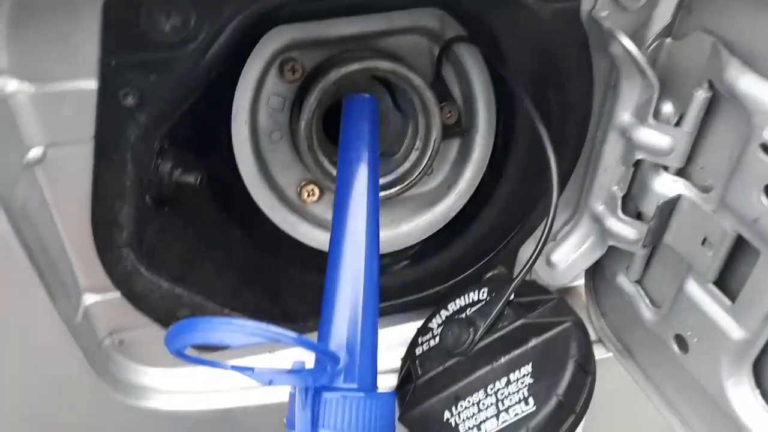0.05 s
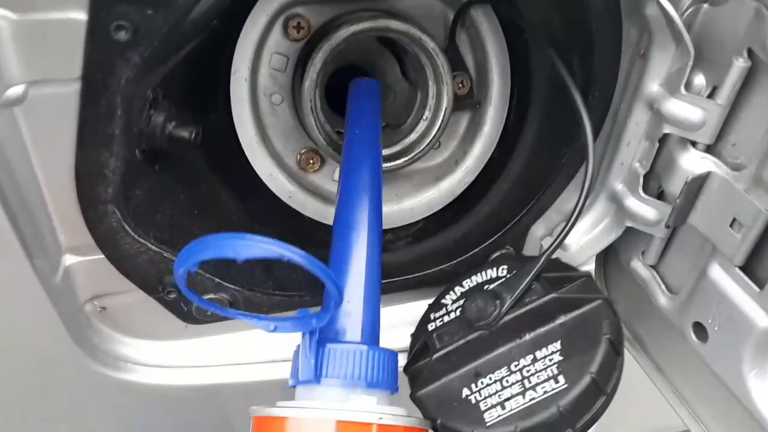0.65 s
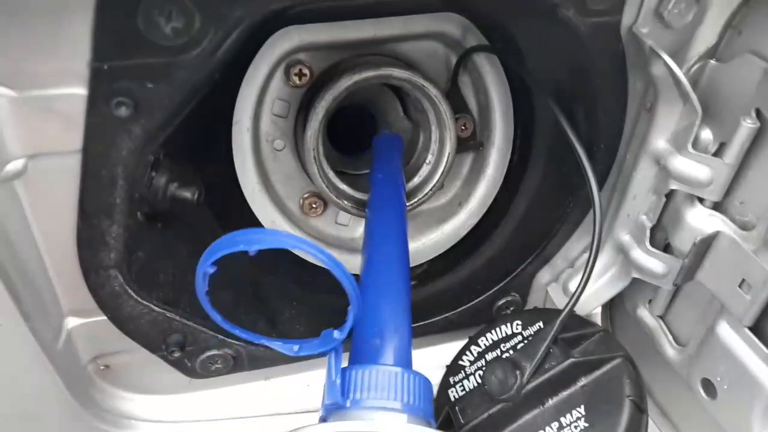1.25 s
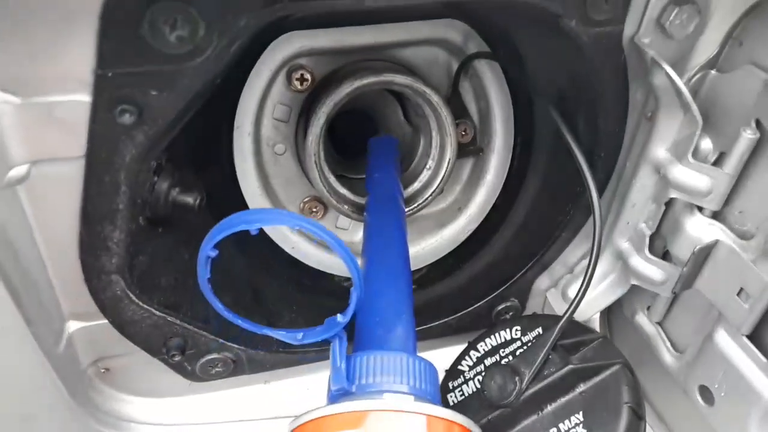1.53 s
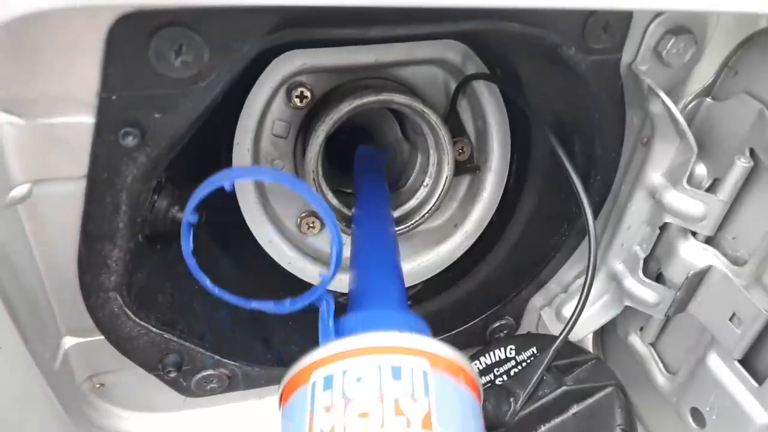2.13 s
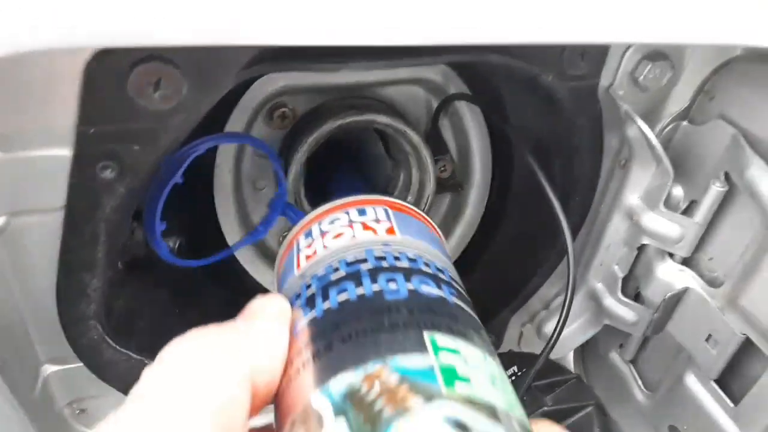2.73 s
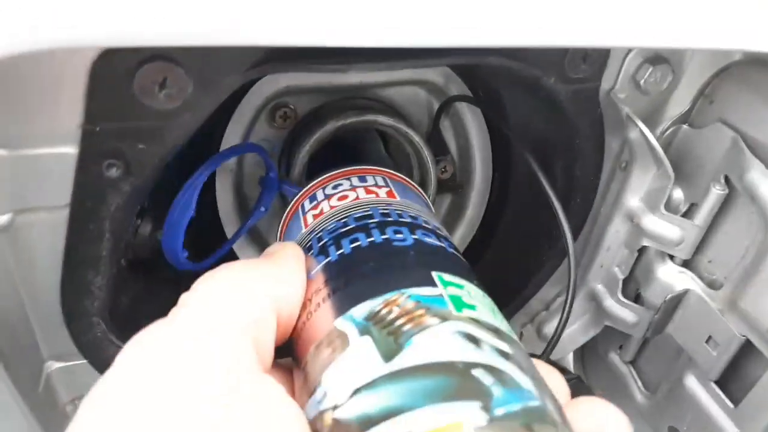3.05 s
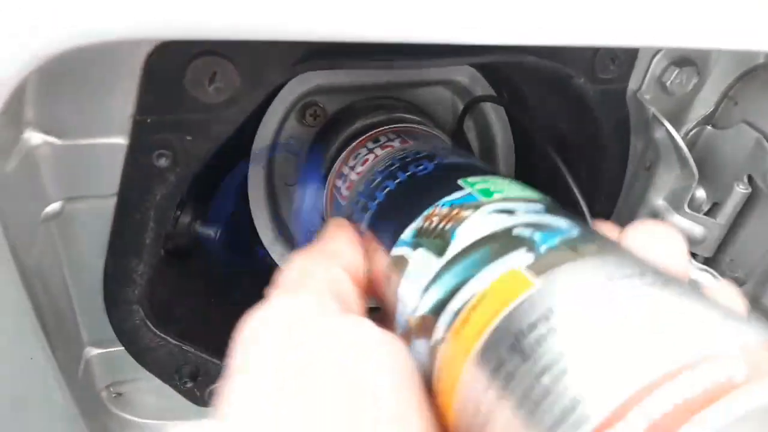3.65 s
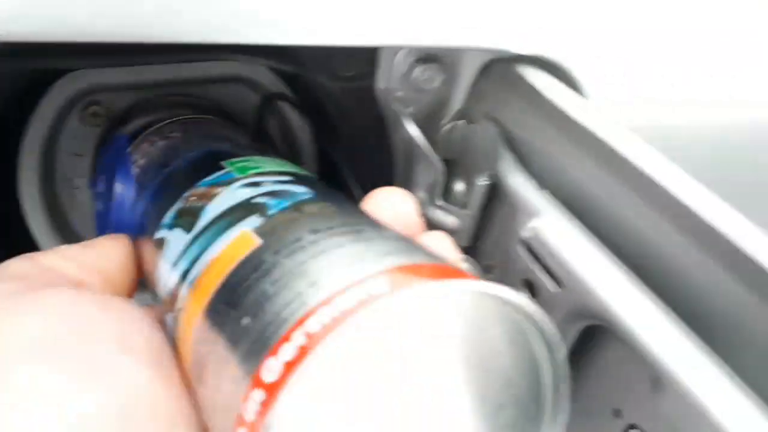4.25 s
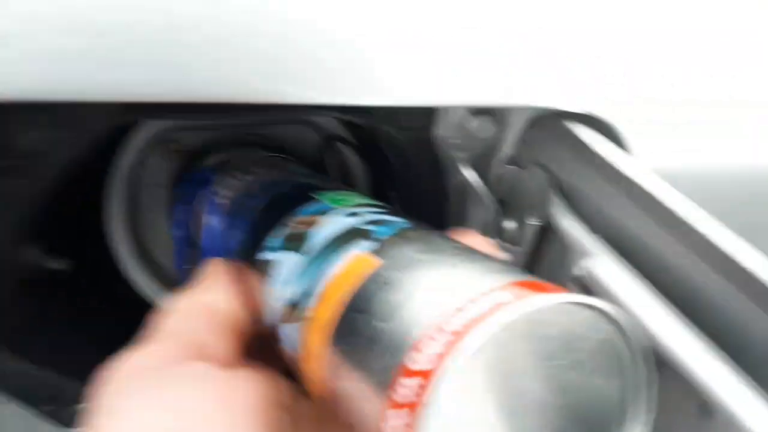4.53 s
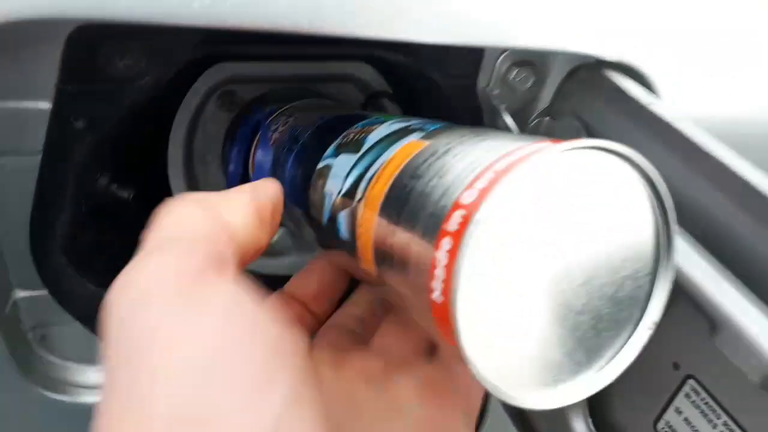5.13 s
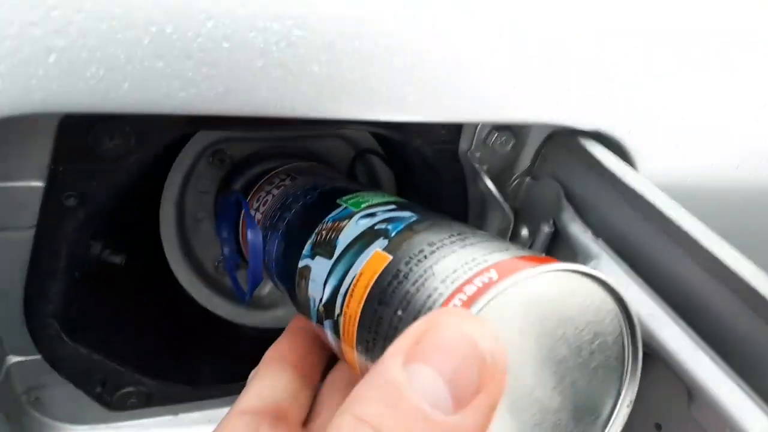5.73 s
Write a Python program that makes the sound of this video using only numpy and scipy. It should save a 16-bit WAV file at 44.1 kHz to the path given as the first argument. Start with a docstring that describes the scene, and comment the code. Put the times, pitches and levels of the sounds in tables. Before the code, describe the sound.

Close by in quiet open air, bubbles gulp back into a can of liquid and resonate in a car's filler neck. The gurgling eases, then the can is upended with light taps and a tinny ring. Several shakes follow, bringing short fizzy sloshes, wavering metallic tones, more glugs and sharp clicks of the plastic spout on the rim. A faint distant rumble and hum lie underneath.

```python
"""Outdoors, over a low hum, a metal can of fuel additive is poured into a car's filler neck.
First air glugs back into the can and echoes in the neck, and the plastic spout clicks on the steel rim.
After about two seconds the can is knocked and turned upside down, and its thin wall rings.
From then on it is shaken: liquid swishes over the wall and makes the ringing pitch wobble,
while the glugs and clicks go on to the end."""
import sys
import numpy as np
from scipy import signal
from scipy.fft import rfft, irfft, next_fast_len
from scipy.io import wavfile

SR = 44100
rng = np.random.default_rng(int(sys.argv[2]) if len(sys.argv) > 2 else 0)


def wrap_up_sound(samples):
    """Save the sound to the file named by the first command line argument, as 16-bit audio."""
    columns = np.atleast_2d(samples).T
    # keep every value between -1 and 1, then stretch to whole-number steps
    tamed = np.clip(columns, -1, 1)
    steps = np.round(tamed * 32767).astype(np.int16)
    wavfile.write(sys.argv[1], SR, steps)


N = 255339
TIME = np.arange(N) / SR  # seconds since the scene began
AGE = np.arange(SR // 2) / SR  # seconds since one short sound began
UPENDED_S = 2.385  # when the can turns upside down

# A "colour" says how strong a sound is from low to high. A fade_s is the time to fade by 60 dB.
# how alike a noise is in both ears (1 = the same): frequency_hz, likeness
EAR_LIKENESS = [(60, 0.99), (400, 0.73), (1000, -0.044), (2000, -0.15), (5000, -0.038), (8000, -0.044),
                (15000, -0.012)]
# colour of the open air: frequency_hz, level_db
AIR_COLOUR = [(53, -35), (90, -12.5), (172, -13), (192, -17.5), (224, -11), (255, -21.5), (296, -13.5),
              (457, -25.5), (935, -26), (1570, -32), (1790, -32), (4960, -47), (13200, -45), (16000, -49)]
# colour of the distant rumble: frequency_hz, level_db
RUMBLE_COLOUR = [(20, -38), (35, -19.5), (52, 0.5), (75, -4.5), (120, -4), (200, -10.5), (400, -48),
                 (2000, -100)]
# a far-off hum swelling and sinking: time_s, level_db
HUM_LEVELS = [(0, -64), (1.0, -61), (1.7, -52.5), (2.4, -53), (3.2, -55), (4.0, -68), (4.8, -58),
              (5.79, -55)]
# air bubbles entering the can: start_s, level_db, pitch_hz, fade_s, share_into_neck, splash_vs_bubble_db
GLUGS = [ (0.017, -46.5, 251, 0.32, 1, -15), (0.539, -31.5, 251.2, 0.13, 0.94, -27.5),
         (.642, -27.5, 261.5, 0.099, 0.22, -26), (.677, -14, 254.4, 0.08, .63, -23),
         (0.678, -40.5, 1358, 0.05, 0.27, -17), (.697, -16.5, 242, 0.065, 0.01, -42.5),
         (.877, -31, 1030, 0.094, 0.12, 2), (0.884, -35, 237.5, 0.22, 1, -32),
         (0.906, -32.5, 328, 0.2, 0.1, -1.5), (.938, -34, 251, 0.13, 0.34, -4),
         (.967, -20.5, 257, 0.037, 0.23, -9.5), (1.006, -16, 222, 0.031, 0.58, -18),
         (1.03, -45.5, 268.6, 0.48, 0, -4), (1.294, -25.5, 814, 0.032, 0.9, -21),
         (1.295, -49, 948, 0.18, 0.55, 8.5), (1.297, -57.5, 1710, 0.2, 0.14, -8),
         (1.355, -36.5, 587, 0.18, 0.77, -13), (1.519, -50.5, 455, 0.22, 0.04, 4.5),
         (1.595, -47, 1880, 0.036, .27, -1), (2.236, -53, 800, 0.0079, 0.94, 13),
         (2.303, -45, 2050, 0.1, 0.2, -20), (2.393, -31.5, 878, 0.036, 0.27, -28),
         (3, -4.5, 337.5, 0.021, 0.97, -17), (3.02, -20.5, 542, 0.041, 0.98, -2.5),
         (3.03, -37.5, 164, 0.22, 0.45, -22), (3.205, -46, 450, 0.06, .03, 10.5),
         (3.258, -29, 194.3, 0.047, 0.3, -18), (3.76, -27, 346.3, 0.16, 0.11, -6),
         (3.815, -18.5, 248, 0.042, 0.27, -13.5), (4.292, -38, 207, 0.033, 0.54, -6.5),
         (4.379, -24, 216, 0.037, 0.21, -15), (4.478, -22, 350, 0.025, 1, -14),
         (4.554, -43, 580, 0.031, 1, 8), (4.827, -25.5, 199, 0.064, 0.35, -5),
         (4.911, -22, 208, 0.038, 0.46, -8), (5.1, -26.5, 150, 0.13, 0.76, -4.5),
         (5.11, -29.5, 405, 0.018, 0.6, -12), (5.149, -41, 198, 0.12, 0.3, -16),
         (5.286, -33.5, 338, 0.034, 0.4, -8.5), (5.511, -16, 453, 0.012, 1, -17),
         (5.513, -29.5, 602, 0.07, 0.02, -3), (5.545, -45, 2380, 0.13, 0.24, -11),
         (5.593, -39, 1074, 0.026, 0.46, -8), (5.64, -20.5, 373, 0.038, 0.46, -11),
         (5.641, -34.5, 622, 0.15, 0.35, -35), (5.702, -37, 182, 0.47, 0, -4),
         (5.707, -20, 357, 0.039, 0.33, -11), (5.754, -46, 1300, 0.46, 0.1, 7.5)]
# colour of a glug's splash, muffled by the neck: frequency_hz, level_db
SPLASH_COLOUR = [(60, 5), (170, 9.5), (400, 3.5), (800, -6), (1300, -6.5), (1900, -13), (2600, -32),
                 (5000, -40.5), (12000, -68.5)]
# notes of the air in the filler neck: pitch_hz, width_hz, level_db
NECK_NOTES = [(164, 4.7, -5), (229.8, 8.7, -3.5), (279.7, 26, -7), (366.5, 7.56, 5), (468.3, 12.7, 5),
              (568.6, 9.7, -6), (673, 19, -0.5), (747, 35, -1), (878, 24.5, -4), (983, 15, 4.5),
              (1120, 25, -10.5), (1395, 22, -20.5), (1816, 18, -15)]
# spout catching on the rim: start_s, level_db, pitch_hz, fade_s, brightness_db_per_octave, left_vs_right_db
CLICKS = [(0.675, -39, 1920, 0.014, -8.5, -3), (0.876, -35, 5660, 0.015, 3.5, -0.5),
          (.967, -35.5, 1620, 0.013, -13, -8), (1.517, -59.5, 2240, 0.18, -1.5, -2),
          (2.261, -45, 14300, 0.013, 13.5, -2), (2.303, -39.5, 2120, 0.0097, 7, -2),
          (2.323, -49, 2110, .014, 7, -3), (2.392, -46.5, 2560, 0.084, -4, -2),
          (2.439, -40, 4500, 0.028, 3, -3.5), (2.458, -41.5, 8250, 0.028, 13, -2),
          (2.906, -37, 2700, 0.02, 2, -1), (2.939, -18, 2720, .025, -3, -0.5),
          (2.94, -27.5, 12000, 0.022, 17, -5.5), (2.999, -33, 2180, 0.038, 1.5, 2),
          (3.054, -47, 2610, 0.022, -1, 6), (3.082, -38.5, 4200, 0.039, -3.5, -2),
          (3.102, -35, 2760, 0.029, -2.5, -2), (3.142, -54, 4200, 0.028, -3, -7),
          (3.208, -38.5, 1430, 0.033, -6, -6), (3.273, -41, 2200, 0.012, -1.5, -3),
          (3.752, -24.5, 1610, 0.067, -2, 1.5), (3.756, -18, 6980, 0.028, 15.5, -2.5),
          (3.794, -30, 6450, 0.014, 1, -7), (3.908, -53, 7000, 0.078, 10, -2),
          (3.955, -56.5, 7000, 0.097, 12, -1), (3.994, -49, 4940, .014, 1, 6.5),
          (4.035, -41, 4770, 0.011, -1.5, -3), (4.29, -33.5, 2793, 0.03, 5, 4.5),
          (4.333, -35.5, 2000, .02, -8.5, -3), (4.571, -30, 3400, 0.018, -4, 5.5),
          (4.684, -36, 4040, 0.066, -0.5, 5), (4.763, -32.5, 2050, 0.0096, -3.5, -5.5),
          (4.841, -26.5, 6170, 0.024, -1.5, 1), (5.319, -49, 1870, 0.019, 3.5, -6),
          (5.42, -48, 5660, 0.022, 6.5, 1), (5.705, -39.5, 2000, .03, -14, -7),
          (5.728, -53.5, 6700, 0.02, 5, 10)]
# colour of a click: frequency_hz, level_db
CLICK_COLOUR = [(400, -2.5), (800, 1.5), (1600, 4), (2200, 4), (2800, 1), (4000, 0), (5500, -8.5),
                (7200, -9), (8500, -22), (11500, -18), (15000, -25.5)]
# notes of the spout and rim: pitch_hz, width_hz, level_db
RIM_NOTES = [(1590, 50, -13.5), (2915, 67, -7.5), (4200, 400, -14.5), (5660, 670, -4.5), (7000, 3000, -2),
             (11280, 1000, -13)]
# knocks that ring the can wall: start_s, level_db, fade_s, overtones_db
KNOCKS = [(2.299, -39.5, 0.7, -8), (2.447, -42, 0.072, -13), (2.634, -38, 0.18, -26),
          (2.735, -57.5, 0.86, -5), (2.909, -29.5, 0.64, -7), (2.998, -30, 0.35, 2), (3.187, -38, 0.27, -2),
          (3.381, -60.5, 1, -4), (3.759, -34, 0.34, 8), (3.785, -30.5, 0.11, -28), (4.292, -48.5, 0.25, 15),
          (4.503, -41, 0.29, -20), (4.545, -34, 0.26, -16), (4.845, -51, 0.24, 24), (5.308, -31, .29, -13)]
# the wall's higher notes: times_lowest_pitch, level_db, share_of_wobble
CAN_OVERTONES = [(1.64, -21, 0.43), (2.782, -16.5, .7)]
# shakes of the can: first_wave_s, wash_db, fizz_vs_wash_db, loss_per_wave_db, pitch_swing_hz, waves_per_s
SHAKES = [(2.36, -51.5, -9.5, 10.5, -1, 9.5), (2.647, -59, -20, 0, 74, 7.46),
          (3.076, -42.5, -5.5, 25, 101.5, 7.8), (3.795, -39, -14.5, 12.5, 99, 7.5),
          (4.26, -57.5, -13.5, 1, 11.5, 5.4), (4.548, -47, -5.5, 12, 99.5, 6),
          (5.334, -44, -5.5, 19, 110, 6.6), (5.568, -55.5, -2, 14, -6, 2.9)]
# colour of liquid washing over the wall: frequency_hz, level_db
WASH_COLOUR = [(400, 2), (700, 3.5), (1300, -4), (1800, 0.5), (2700, -5), (3700, -22), (5000, -22)]
# colour of its fizz: frequency_hz, level_db
FIZZ_COLOUR = [(3000, -44), (4200, 5.5), (5000, 0.5), (7200, 5), (8200, -10), (9500, -51)]
# colour of its finest hiss: frequency_hz, level_db
HISS_COLOUR = [(7000, -37.5), (9000, -1.5), (11700, 11), (15000, 1.5), (17000, -25)]
# colour of tiny bubbles bursting: pitch_hz, level_db
PING_COLOUR = [(1500, -13.5), (2600, -8.5), (4200, 11), (7000, -25.5), (8200, -4.5)]


def from_db(db):
    """Turn decibels into a number to multiply by."""
    return 10 ** (np.asarray(db) / 20)


def unit_level(x):
    """Scale a sound so that its average strength (rms) is 1."""
    return x / np.sqrt(np.mean(x ** 2) + 1e-20)


def at_hz(table, hz):
    """Look up a two-column table at any frequency."""
    frequencies, values = np.transpose(table)
    return np.interp(np.log(hz + 1), np.log(frequencies), values)


def fade(fade_s, age=AGE):
    """Start at 1 and fall by 60 dB every fade_s seconds."""
    return np.exp(-np.log(1000) * age / fade_s)


def rise(rise_s, age=AGE):
    """Start at 0 and climb towards 1."""
    return 1 - np.exp(-age / rise_s)


def add(track, start_s, sound):
    """Mix a sound into a track from start_s on."""
    start = round(start_s * SR)
    track[..., start:start + sound.shape[-1]] += sound[..., :N - start]


def pan(db):
    """Make the left side db louder than the right."""
    return from_db(np.array([[db], [-db]]) / 2)


def keep_side(x, hz, side):
    """Keep what is on the "low" or "high" side of hz."""
    return signal.sosfilt(signal.butter(2, hz, side, fs=SR, output="sos"), x + 1e-18)


def resonate(x, hz, width_hz):
    """Let a sound ring at one pitch; a narrower width rings longer."""
    r = np.exp(-np.pi * width_hz / SR)
    feedback = [1, -2 * r * np.cos(2 * np.pi * hz / SR), r * r]
    return signal.lfilter(np.array([1, 0, -1]) * (1 - r * r) / 2, feedback, x + 1e-18)


def noise(colour, size, brightness_db=0):
    """Stereo noise of a given colour, with the bass alike in both ears."""
    padded = next_fast_len(size)
    hz = np.arange(padded // 2 + 1) * SR / padded
    middle, side = rfft(rng.standard_normal((2, padded)))
    alike = at_hz(EAR_LIKENESS, hz)
    stereo = np.sqrt(1 + alike) * middle + np.sqrt(1 - alike) * side * [[1], [-1]]
    gain = from_db(at_hz(colour, hz) + brightness_db * np.log2(hz / 1000 + 1))
    return unit_level(irfft(gain * stereo, padded)[:, :size])


def wander(per_s):
    """Drift around 0, reaching a new random value per_s times a second."""
    return np.interp(TIME * per_s, np.arange(N // 8), rng.standard_normal(N // 8))


def flicker(depth_db, per_s):
    """A volume that jumps about at random."""
    return unit_level(from_db(depth_db * wander(per_s)))


def outdoors(air_db=-61, rumble_db=-56, hum_hz=53, waver_hz=2.5):
    """Quiet open air over a distant rumble and a low, slightly wavering hum."""
    pitch = hum_hz + waver_hz * wander(12)
    times, levels_db = np.transpose(HUM_LEVELS)
    hum_level = from_db(np.interp(TIME, times, levels_db))
    hum = np.sqrt(2) * hum_level * np.sin(2 * np.pi * np.cumsum(pitch) / SR)
    return from_db(air_db) * noise(AIR_COLOUR, N) + from_db(rumble_db) * noise(RUMBLE_COLOUR, N) + hum


def glugs(swell_cycles=0.66, pitch_climb=0.029, splash_fade_s=0.21):
    """Each air bubble breaks off with a splash, swells quickly and rings with a slightly rising pitch."""
    direct, into_neck = np.zeros((2, N)), np.zeros(N)
    for start_s, db, hz, fade_s, share, splash_db in GLUGS:
        pitch = hz * (1 + pitch_climb * (1 - fade(fade_s)))
        swell = 1 - np.exp(-(AGE * hz / swell_cycles) ** 2)
        bubble = np.sin(2 * np.pi * np.cumsum(pitch) / SR) * fade(fade_s) * swell
        # the bigger the bubble, the deeper its splash sounds
        drops = keep_side(noise(SPLASH_COLOUR, len(AGE)), 0.59 * hz, "high")
        drops = keep_side(drops, 130, "high")
        splash = drops * fade(splash_fade_s) * rise(0.00033) * from_db(splash_db - 5)
        add(direct, start_s, from_db(db) * ((1 - share) * bubble + splash))
        add(into_neck, start_s, from_db(db) * share * (bubble + splash.mean(axis=0) / 2))
    return from_db(4) * (direct * flicker(2.5, 120) + filler_neck(into_neck)) * pan(1.86)


def filler_neck(x):
    """The air in the neck rings at its own notes, like a pipe closed at one end."""
    return sum(from_db(db + 10) * resonate(x, hz, width) for hz, width, db in NECK_NOTES)


def yard_echoes(x, fade_s=0.66, level_db=-26, top_hz=3500):
    """Sound bounces faintly off the car body and the yard."""
    echoes = keep_side(rng.standard_normal((2, len(AGE))), top_hz, "low")
    echoes = echoes * fade(fade_s) * (1 - fade(0.058))
    echoes /= np.sqrt(np.sum(echoes ** 2) / 2 * SR / 2 / top_hz)  # gain of about 1 below top_hz
    return from_db(level_db) * signal.fftconvolve(x, echoes, axes=1)[:, :N]


def spout_clicks(tail_db=-23, tail_fade_s=0.24, ring_db=6):
    """The spout catches on the rim: a crack with one main pitch, then a tail from the hollow around it."""
    out, age = np.zeros((2, N)), AGE[:SR // 4]
    for start_s, db, hz, fade_s, brightness_db, pan_db in CLICKS:
        shape = (fade(fade_s, age) + from_db(tail_db) * fade(tail_fade_s, age)) * rise(0.0009, age)
        crack = noise(CLICK_COLOUR, len(age), brightness_db) * shape
        ring = from_db(ring_db) * resonate(crack, hz, width_hz=250)
        add(out, start_s, from_db(db) * pan(pan_db) * (crack + ring))
    return from_db(3.5) * rim(out)


def rim(x, plain_db=-5):
    """The spout and rim add their own notes to each click."""
    return from_db(plain_db) * x + sum(from_db(db) * resonate(x, hz, width) for hz, width, db in RIM_NOTES)


def can_wall(rest_hz=980, ripple_hz=12):
    """Knocks ring the can; moving liquid bends all its notes together, and ripples roughen them."""
    pitch = wall_pitch() + ripple_hz * wander(250)
    low_level, high_level, age = np.zeros(N), np.zeros(N), TIME[:SR]
    for start_s, db, fade_s, overtones_db in KNOCKS:
        shape = from_db(db) * fade(fade_s, age) * rise(0.00072, age)
        add(low_level, start_s, shape)
        add(high_level, start_s, shape * from_db(overtones_db))
    out = low_level * flicker(3.5, 130) * np.sin(2 * np.pi * np.cumsum(pitch) / SR) * pan(-4)
    # higher notes spread unevenly, so the two ears hear them out of step
    ear_shift = np.array([[0], [np.pi / 2]])
    for ratio, db, share in CAN_OVERTONES:
        overtone_hz = ratio * (rest_hz + share * (pitch - rest_hz))
        phase = 2 * np.pi * np.cumsum(overtone_hz) / SR
        out += from_db(db) * high_level * flicker(6.3, 170) * np.sin(phase + ear_shift)
    return out


def wall_pitch(wet_hz=765, drained_hz=958, drain_s=0.0226, build_s=0.055, slosh_fade_s=1.5):
    """The pitch rises as liquid drains off the upended can's wall, then swings with every shake."""
    drained = (1 + np.tanh((TIME - UPENDED_S) / drain_s / 2)) / 2
    hz = wet_hz + (drained_hz - wet_hz) * drained
    for first_wave_s, *_, swing_hz, waves_per_s in SHAKES:
        age = TIME - first_wave_s
        build_up = np.exp(-(np.minimum(age, 0) / build_s) ** 2)
        slosh = build_up * fade(slosh_fade_s, np.maximum(age, 0))
        hz += swing_hz * slosh * np.cos(2 * np.pi * waves_per_s * age)
    return hz


def swish(hiss_db=-8, ping_db=-6, brisk_db=-56):
    """Shaken liquid washes over the wall in uneven spurts; a brisk wash sheds tiny bubbles."""
    wash, fizz = wash_levels()
    layers = (wash, WASH_COLOUR), (fizz, FIZZ_COLOUR), (fizz * from_db(hiss_db), HISS_COLOUR)
    flow = sum(level * noise(colour, N) * flicker(1.5, 500) for level, colour in layers)
    briskness = np.minimum(wash / from_db(brisk_db), 1)
    bubbles = from_db(ping_db) * briskness * np.sqrt(wash * fizz) * bubble_pings()
    return flow * flicker(6, 83) + bubbles


def wash_levels(wave_rise_s=0.029, wave_fall_s=0.044, spray_db=-19.5, spray_fizz_db=-16.5):
    """How strong wash and fizz are: a shake sends three waves, and glugs spray inside the upended can."""
    wash, fizz, spray = np.zeros((3, N))
    for first_wave_s, db, fizz_db, loss_db, _, waves_per_s in SHAKES:
        for k in range(3):
            age = TIME - first_wave_s - k / waves_per_s
            wave = from_db(db - k * loss_db) * np.exp(-np.maximum(-age / wave_rise_s, age / wave_fall_s))
            wash += wave
            fizz += wave * from_db(fizz_db)
    for start_s, db, *_, splash_db in GLUGS:
        if start_s > UPENDED_S:
            add(spray, start_s, from_db(db + splash_db + spray_db) * fade(0.24) * rise(0.0073))
    return np.hypot(wash, spray), np.hypot(fizz, spray * from_db(spray_fizz_db))


def bubble_pings(per_s=380, spread_db=6, ring_cycles=13, pitch_count=26):
    """Tiny bubbles burst at random, each ringing briefly at one of many pitches."""
    sizes = from_db(spread_db * np.minimum(rng.exponential(1, N), 3.5))
    bursts = sizes * (rng.random(N) < per_s / SR)
    which_pitch, out = rng.integers(0, pitch_count, N), np.zeros((2, N))
    for k, hz in enumerate(np.geomspace(PING_COLOUR[0][0], PING_COLOUR[-1][0], pitch_count)):
        ring = resonate(bursts * (which_pitch == k), hz, hz / ring_cycles / np.pi)
        ring = unit_level(ring) * from_db(at_hz(PING_COLOUR, hz))
        right = np.roll(ring, rng.integers(-8, 9))  # a tiny time shift gives each pitch its own place
        out += np.array([ring, right]) * pan(rng.normal(0, 3))
    return unit_level(out)


def scene():
    """The pouring, its echoes and the open air together."""
    pour = glugs() + can_wall() + spout_clicks() + swish()
    return pour + yard_echoes(pour) + outdoors()


def record(dry):
    """Cut off the very highest treble, above 15750 Hz."""
    return signal.sosfilt(signal.ellip(10, .1, 80, 15750, fs=SR, output="sos"), dry)


dry = scene()
out = record(dry)
wrap_up_sound(out)
```